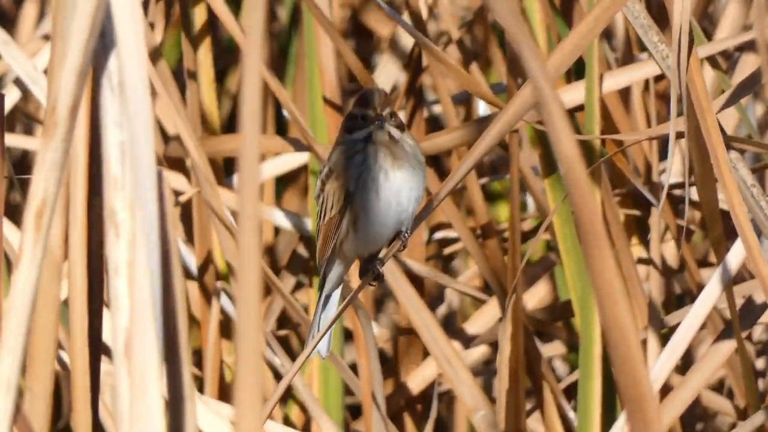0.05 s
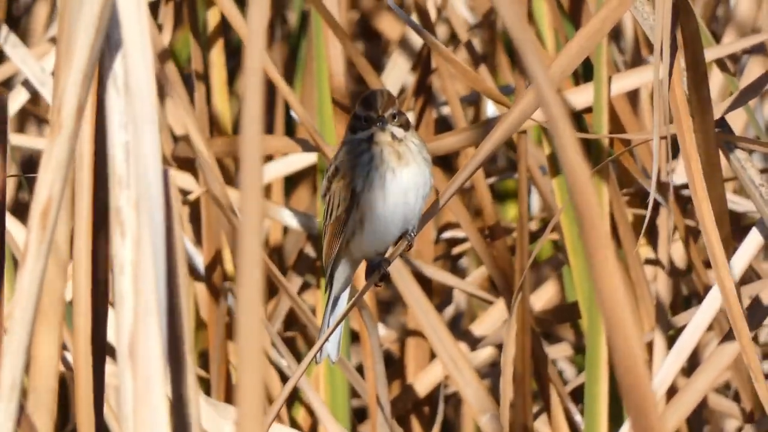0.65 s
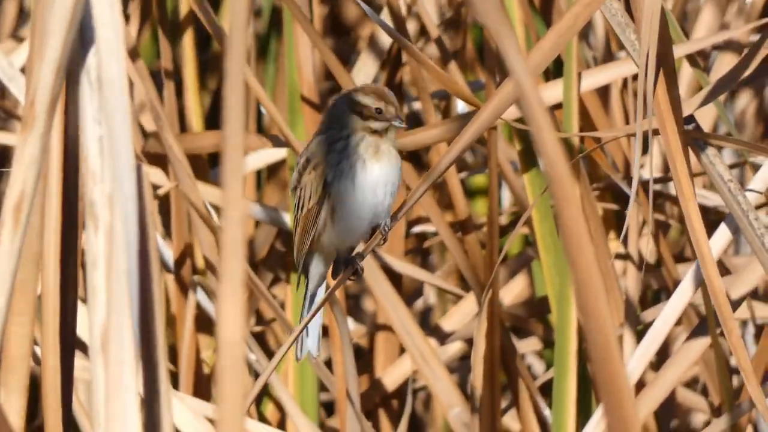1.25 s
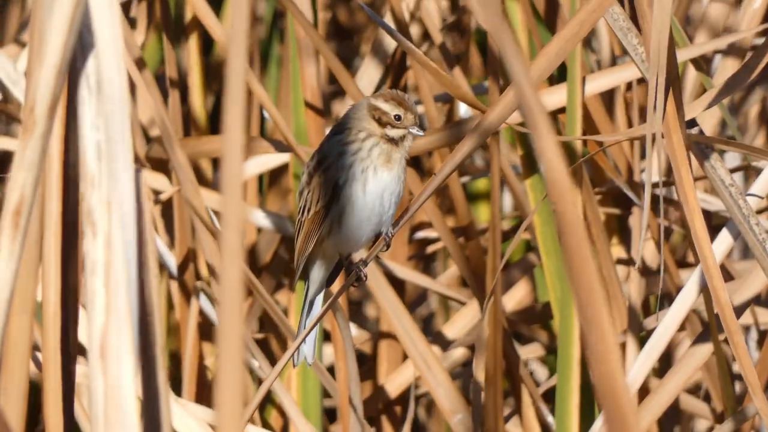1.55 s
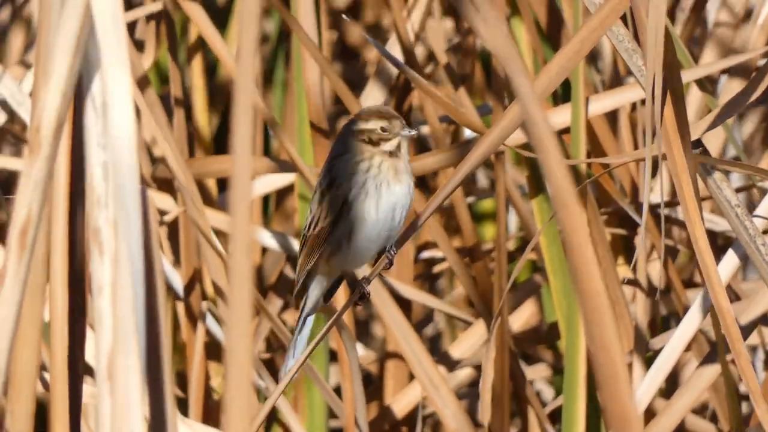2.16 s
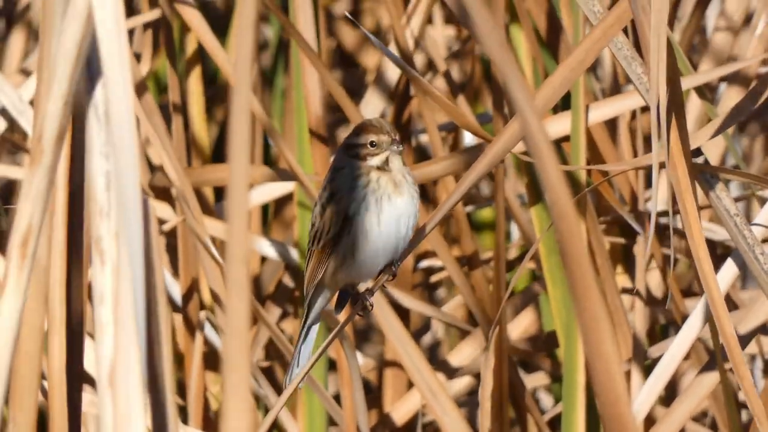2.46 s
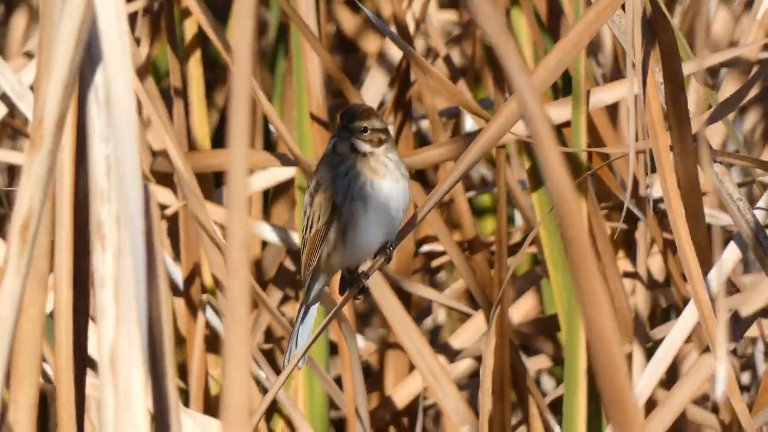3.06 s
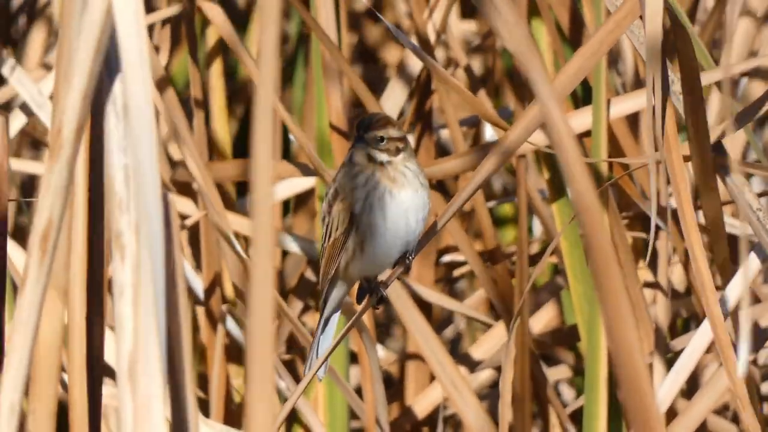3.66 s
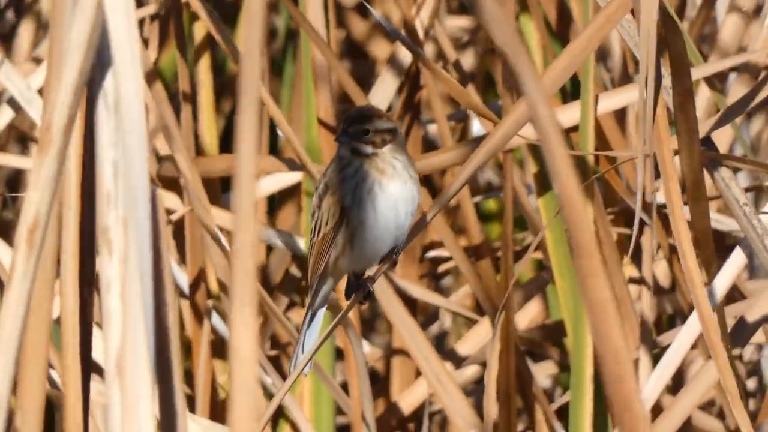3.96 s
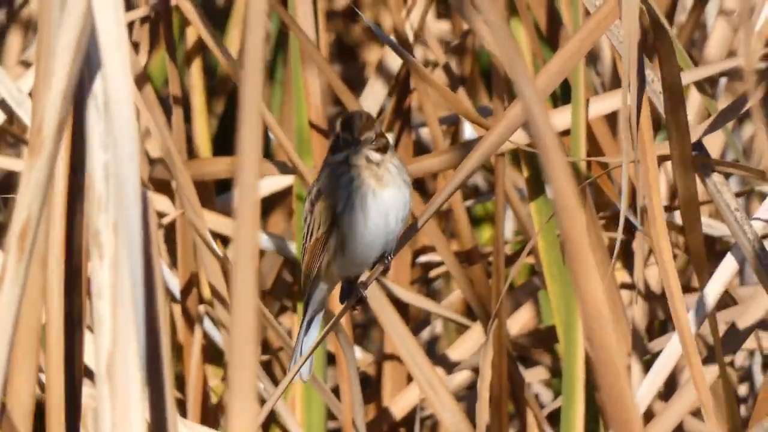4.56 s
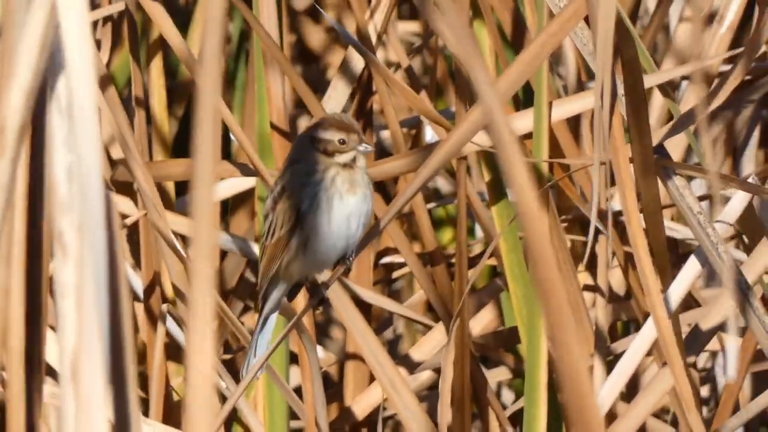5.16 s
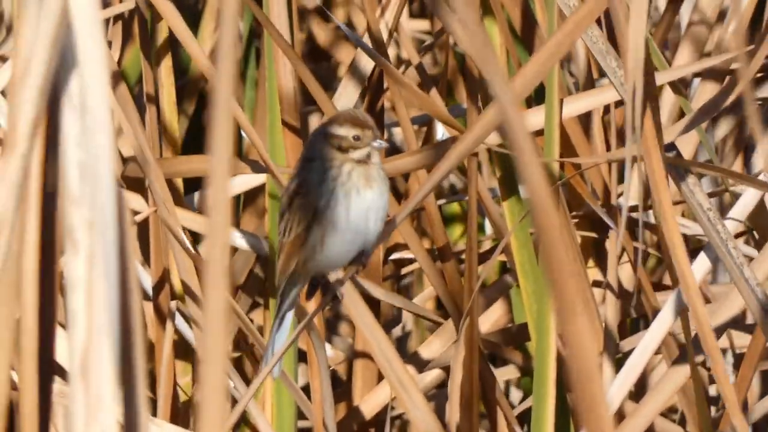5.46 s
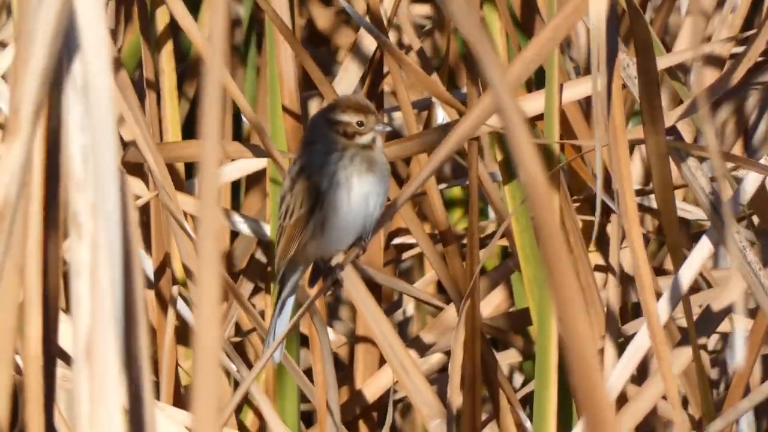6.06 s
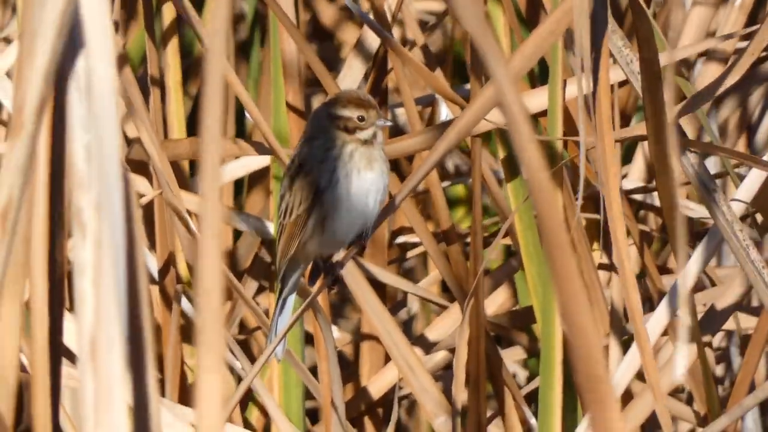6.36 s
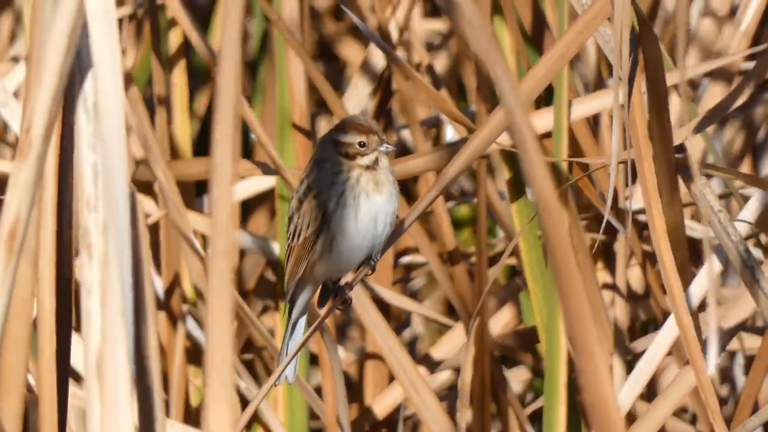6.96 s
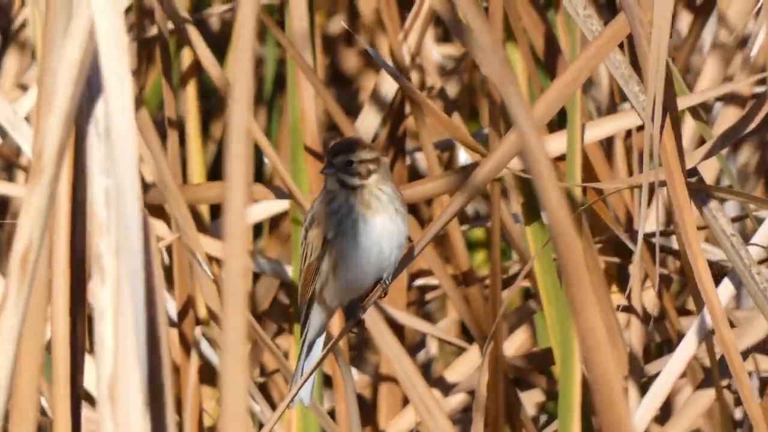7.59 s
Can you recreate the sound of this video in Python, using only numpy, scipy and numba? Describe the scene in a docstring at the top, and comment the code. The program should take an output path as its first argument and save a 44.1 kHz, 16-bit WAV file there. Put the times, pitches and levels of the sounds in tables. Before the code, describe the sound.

Outdoors in dry reeds, a soft hum and thin hiss run throughout. A small bird close by gives three quick, high, raspy chirps. Light wind then buffets the microphone in low puffs, building to one hard thump, while a distant bird whistles very faintly. Two softer runs of rapid chirps follow, among more puffs of wind and a few faint ticks of dry stems.

```python
"""In dry reeds, a soft resonant hum, likely the camera's lens motor, and thin hiss run throughout.
Light wind buffets the microphone in low puffs. At 1.8 s a small bird perched nearby gives a run of
quick, arched chirps from its syrinx; the stems scatter them. From 3.6 s a far bird whistles faintly.
The hardest puff, at 5.3 s, makes the gain control duck. Two softer runs of chirps follow at 5.8 s
and 7 s, among more puffs and the ticks of dry stems."""
import sys
import numpy as np
from scipy import signal
from scipy.fft import rfft, irfft, next_fast_len
from scipy.io import wavfile
from scipy.ndimage import uniform_filter1d
from numba import njit

SR = 44100
rng = np.random.default_rng(int(sys.argv[2]) if len(sys.argv) > 2 else 0)


def wav_out(sig):
    """Save sig, one row per channel (or a flat mono array), as 16-bit PCM at SR to the path in sys.argv[1]."""
    wavfile.write(sys.argv[1], SR, np.round(np.clip(np.atleast_2d(sig).T, -1, 1) * 32767).astype(np.int16))


N = 345303
T = np.arange(N) / SR


# the near bird's chirps: t/s, upsweep/s, arch/s, top f/Hz, level/dB, arch against the rest/dB
NEAR_CHIRPS = [(1.8, .013, 0.017, 7720, -39, 4.5), (1.874, .0165, 0.0087, 7020, -29, 3.5),
               (1.96, .021, 0.0092, 7020, -27.5, -1.5), (5.81, 0.017, .007, 6940, -58, -8),
               (5.885, 0.014, 0.0056, 6850, -50, -9), (5.977, 0.012, 0.016, 6880, -47.5, -2),
               (6.958, 0.011, .015, 7200, -53.5, -2), (7.035, 0.013, 0.011, 6450, -48, 0),
               (7.114, .013, .010, 6630, -45.5, -4), (7.214, 0.017, 0.0094, 7280, -40.5, -3),
               (7.299, .017, 0.01, 6860, -43, -5), (7.427, 0.013, 0.015, 6690, -45, -7.5),
               (7.516, .016, .011, 7000, -43.5, -7)]
# the top of the voice is beamed forward and dulls as the head turns: t/s, treble level/dB
BEAMED_TREBLE = [(1.9, -6), (5.9, -12), (7.3, -22)]
def near_bird(ordinary_db=-50):
    """Chirps among the stems; louder ones are aimed at the microphone and arrive more directly."""
    out = np.zeros((2, N))
    for s, sweep_s, arch_s, top_hz, db, arch_db in NEAR_CHIRPS:
        scatter_db = 1.5 - 0.2659 * max(db - ordinary_db, 0)
        voice = syrinx(sweep_s, arch_s, top_hz, arch_db)
        chirp = throat(voice, treble_db=np.interp(s, *np.transpose(BEAMED_TREBLE)))
        add(out, s, undb(db) * signal.fftconvolve(chirp[None], reeds(scatter_db), axes=1))
    return out


# a chirp opens with an upsweep: share of the sweep, share of the top pitch, level/dB
UPSWEEP = [(0, .37, -13), (0.251, .49, -7.5), (0.542, .64, 0.5), (.8, .84, -6)]
# it crests, sags and lifts again: share of the arch, share of the top pitch, level/dB
CREST = [(0, 1, -5.5), (0.201, 0.94, -5.5), (.55, .88, -3), (.88, .93, -9)]
# then it zigzags down: t/s after the arch, f/Hz, level/dB
ZIGZAG = [(.001, 5330, -4.5), (.003, 5030, 1.5), (.007, 5900, -3.5), (.009, 5390, -2), (.0112, 4350, 0),
          (0.014, 4800, -6.5), (.0185, 3790, -5.5)]
def syrinx(sweep_s, arch_s, top_hz, arch_db, second_ratio=.87, second_db=-8, overtone_db=-10,
           jitter=.035, rasp=.33, falter_db=2.2, fizz_db=-8, edge_s=0.0012):
    """Two grating voices sweep up, arch and zigzag down, fluttering in pitch and loudness."""
    contour = [(share * sweep_s, part * top_hz, db) for share, part, db in UPSWEEP]
    contour += [(sweep_s + share * arch_s, part * top_hz, db + arch_db) for share, part, db in CREST]
    contour += [(sweep_s + arch_s + s, hz, db) for s, hz, db in ZIGZAG]
    s, hz, db = np.transpose(contour)
    t = np.arange(0, s[-1], 1 / SR)
    n = len(t)
    pitch = np.interp(t, s, hz * (1 + .02 * rng.standard_normal(len(hz))))  # no two chirps alike
    phase = phase_of(pitch * (1 + jitter * walk(1500, n)))
    second_phase = phase_of(second_ratio * pitch * (1 + jitter * walk(1500, n)))
    second = undb(second_db) * (np.sin(second_phase) + undb(overtone_db) * np.sin(2 * second_phase))
    # the first voice's octave turns hoarse as the chirp goes on
    blur = 1.1 * np.clip(t / (sweep_s + arch_s), 0, 1) * walk(3000, n)
    overtones = undb(overtone_db) * np.sin(2 * phase + blur) + undb(-24) * np.sin(3 * phase)
    voice = np.sqrt(2) * (np.sin(phase) + second + overtones) + undb(fizz_db) * rng.standard_normal(n)
    edges = np.clip(np.minimum(t, t[-1] - t) / edge_s, 0, 1)
    swell = undb(np.interp(t, s, db) + falter_db * walk(220, n))
    return voice * edges * swell * (1 + rasp * walk(2000, n))


# response of the throat and open beak: f/Hz, level/dB
THROAT_RESPONSE = [(1200, -62), (2400, -17.5), (3200, -20), (4000, -21.5), (4600, -12.5), (5300, -3.5),
                   (6100, 0), (6900, -6.5), (7600, -17), (8300, -21.5), (10300, -8.5), (11800, -17.5),
                   (14500, -19)]
def throat(voice, treble_db, shelf_hz=8300):
    """The throat picks out what passes its resonances; a shelf dulls the top."""
    n = len(voice)
    gain = colour(THROAT_RESPONSE, n) * undb(treble_db * (bins(n) > shelf_hz))
    size = next_fast_len(n, True)
    return irfft(rfft(voice, size) * gain, size)


def reeds(scatter_db, gap_s=0.0021, near_decay_s=0.0092, far_t60_s=0.19, far_db=-7.5):
    """Path to the microphone: direct sound, echoes off the nearest stems, a faint reed-bed tail."""
    n = SR // 3
    t = T[:n]

    def echoes(band, decay_s, side_db):
        return spread(noise(band, n), noise(band, n), side_db) * np.exp(-t / decay_s) / np.sqrt(decay_s)

    # close stems return the whole chirp, the far bed only its middle band
    near = echoes(resonance(10200, 7600, n), near_decay_s, side_db=-13)
    far = echoes(resonance(5200, 4000, n), far_t60_s / np.log(1000), side_db=-7)
    onset = 1 - np.exp(-(t / gap_s) ** 2)
    response = undb(scatter_db) * (near + undb(far_db) * far) * onset * 2 / SR
    response[:, 0] += 1
    return response


# strength of the breeze at the microphone: t/s, relative level/dB
BREEZE_STRENGTH = [(0.0, -54.5), (0.22, -79), (0.34, -53.5), (0.48, -59), (0.74, -49.5), (1.02, -67.5),
                   (2.94, -55.5), (3.02, -47.5), (3.78, -44.5), (4.02, -64), (4.46, -45.5), (4.9, -51),
                   (4.96, -38), (5.26, -31.5), (5.3, -46), (5.8, -47.5), (5.88, -35), (6.2, -38),
                   (6.52, -61.5), (6.62, -40), (7.12, -63.5), (7.56, -39), (7.7, -60.5), (7.82, -50)]
# eddies that stand out from it: t/s, level/dB, length/s, f/Hz, left minus right/dB
STRONG_EDDIES = [(.687, -39, 0.0074, 146.4, -5), (.755, -40.5, 0.055, 169, 2.5),
                 (.875, -48.5, 0.028, 149.5, -1), (2.125, -55, 0.083, 121.7, 2),
                 (2.412, -45.5, 0.019, 140.2, -3), (2.514, -40.5, 0.024, 140.2, 3),
                 (2.855, -37.5, 0.034, 149, 1), (3.0, -33, 0.058, 115.2, -3.5), (3.03, -30, 0.011, 135, -2),
                 (3.177, -32, 0.024, 135, -2), (3.605, -26, 0.033, 119.8, 2), (3.621, -21, 0.012, 175.4, 6),
                 (3.685, -21.5, 0.0049, 233.3, -8), (4.11, -32.5, 0.014, 122.4, 0),
                 (4.425, -36, 0.02, 201.6, -4), (4.657, -32, 0.027, 157.5, -2),
                 (4.972, -33, 0.018, 136.6, 0), (5.04, -26.5, 0.0059, 189, -4),
                 (5.116, -24.5, 0.023, 195.6, -3), (5.153, -28, 0.033, 181.8, -1),
                 (5.217, -28, 0.024, 167, -5.5), (5.25, -28.5, 0.0082, 229, -6),
                 (5.262, -16, 0.012, 226, -2.5), (5.269, -15, 0.0038, 289.7, 13.5),
                 (5.274, -11.5, 0.012, 205, -6), (5.343, -25.5, 0.016, 248.3, 4.5),
                 (5.485, -39.5, 0.012, 223, -4), (5.52, -33, 0.012, 199, -2), (5.583, -37.5, 0.02, 197, -1),
                 (5.675, -26, 0.031, 190, 0), (5.705, -26, 0.015, 154, 0),
                 (5.885, -24.5, 0.0076, 116.8, -4.5), (5.937, -23.5, 0.0078, 148.5, 11),
                 (5.953, -27, 0.025, 208.7, -5), (5.977, -26, 0.018, 173.3, 1),
                 (5.998, -28.5, 0.022, 178.2, 1), (6.08, -31, .014, 140.5, 0),
                 (6.104, -20.5, 0.0067, 221.4, 5), (6.117, -28.5, 0.011, 158.2, -9),
                 (6.136, -32, 0.022, 128.4, 0), (6.183, -32, 0.01, 162.5, 4),
                 (6.23, -35.5, 0.038, 170.8, 5), (6.609, -32.5, 0.017, 135.5, 1),
                 (6.768, -37, 0.027, 118.1, -1), (7.271, -35.5, 0.038, 129.4, -3),
                 (7.508, -27.5, 0.011, 119.3, -1), (7.535, -21.5, 0.0027, 138.5, -5),
                 (7.563, -22.5, 0.013, 113.7, 0), (7.591, -24, 0.022, 170, -0.5)]
def wind(calm_db=-51, gust_db=-36.5, rumble_db=-4, flutter_db=10, low_cut_hz=72):
    """Fluttering rumble on the microphone swells and brightens with the breeze; single eddies thump."""
    breeze = curve(BREEZE_STRENGTH)
    gust = np.clip((breeze - calm_db) / (gust_db - calm_db), 0, 1)
    out = np.sqrt(1 - gust) * rumble(0.8) + np.sqrt(gust) * rumble(1.06)
    out *= undb(breeze + rumble_db + flutter_db * np.minimum(walk(42), 1.1))
    for s, db, length_s, hz, pan_db in list(STRONG_EDDIES) + small_eddies(breeze):
        t, thump = eddy(hz, length_s)
        add(out, s + t[0], undb(db) * pan(pan_db) * thump)
    # the microphone passes little of the deepest air movement
    return signal.sosfilt(signal.butter(3, low_cut_hz, "high", fs=SR, output="sos"), out)


# spectrum of turbulence on the microphone: f/Hz, relative level/dB
TURBULENCE = [(20, -23.5), (40, -25.5), (65, -1.5), (100, 5.5), (160, -0.5), (240, -3.5), (330, -18.5),
              (450, -27.5), (700, -33.5), (1500, -59.5), (3000, -87)]
def rumble(hz_ratio, side_db=-6):
    """Turbulence at the two microphone ports; small eddies differ more between them than large ones."""
    gain = colour([(hz * hz_ratio, db) for hz, db in TURBULENCE])
    apart = colour([(50, -5), (130, 1.5), (300, 12.0)])
    return spread(unit(noise(gain)), unit(noise(gain * apart)), side_db)


# an eddy breaking on the port cracks above its thump: f/Hz, relative level/dB
PORT_CRACK = [(200, -20), (420, 13.5), (900, -8.5), (1400, -11.5), (2600, -29), (4000, -47), (7000, -30),
              (12000, -51)]
def eddy(hz, length_s, wander=0.3, apart_rad=0.68, churn_db=-6, crack_db=-31):
    """A few uneven pressure swings swell and fade; the two ports meet them slightly out of step."""
    n = SR // 6
    t = T[:n] - T[n // 2]
    phase = 2 * np.pi * rng.random() + phase_of(hz * np.exp(wander * walk(400, n)))
    lead = apart_rad * np.tanh(2 * walk(58.2, n))
    swings = np.sqrt(2) * np.cos(phase + lead * np.array([[1], [-1]]))
    churn = unit(noise(colour([(f * hz / 150, db) for f, db in TURBULENCE], n), n))
    crack = unit(noise(colour(PORT_CRACK, n), n))
    bell = np.exp(-np.log(16) * (t / length_s) ** 2)
    return t, (swings + undb(churn_db) * churn + undb(crack_db) * crack) * bell


def small_eddies(breeze, per_s=9, typical_s=0.0086, typical_hz=149.6):
    """Random rows like STRONG_EDDIES, scattered about the breeze's level; shorter ones thump higher."""
    count = int(per_s * N / SR)
    offset, weakness, stretch = rng.uniform(-0.68, 1, (count, 3)).T
    s = (np.arange(count) + .5 + offset / 2) / per_s
    db = np.interp(s, T, breeze) + 2 - 8 * weakness
    slowness = 2 ** (stretch / 2)
    return list(zip(s, db, typical_s * slowness, typical_hz / slowness, np.zeros(count)))


# brief lulls in the hum: t/s, length/s, level/dB
LULLS = [(0.29, 0.018, -10), (0.386, 0.017, -20), (0.483, 0.059, -5)]
def motor_hum():
    """A small motor hums close to the microphone; its level dips briefly near the start."""
    lull_db = sum(db * np.exp(-(2 * (T - s) / length_s) ** 2) for s, length_s, db in LULLS)
    return undb(lull_db) * (camera_body() + whirr() + thin_tone())


# resonances of the body: f/Hz, width/Hz, level/dB per Hz, left minus right/dB, left lead/rad
BODY_MODES = [(399, 78, -79, -2.5, 1.5), (477.5, 88, -75, -0.5, 0.32), (684, 30.6, -83.5, 14, 0.5),
              (795.5, 86, -86, -12, 2), (844, 60, -82, -10.5, 4), (870, 72, -89, 6, 2),
              (1059, 79, -82.5, -11, 2.5), (1189, 105, -91.5, 12, 1.5), (1340, 63, -86.5, -16.5, 4),
              (1402, 41, -84, -14, -0.5), (1498, 110, -94, -11, -1), (1809.5, 115, -87, -6, -1.9),
              (2095.5, 74, -85, -1, -1.2), (2164, 65, -88.5, -3, -1)]
def camera_body(side_db=-8, flicker_db=2.5):
    """The motor's noise rings the camera body; each resonance reaches the two ports differently."""
    out = np.zeros((2, N))
    for hz, width_hz, db, pan_db, lead in BODY_MODES:
        ports = pan(pan_db) * np.exp(.5j * lead * np.array([[1], [-1]]))
        gain = undb(db) * resonance(hz, width_hz) * ports
        out += spread(noise(gain), noise(gain), side_db)
    return out * undb(flicker_db * walk(60))


# the hum's main note: f/Hz, width/Hz, level/dB, left minus right/dB
MAIN_NOTE = (499.5, 16, -55, -6)
def whirr(waver_hz=7, wavers_per_s=1.1):
    """The motor's main note, a narrow band of noise that wavers in pitch."""
    hz, width_hz, db, pan_db = MAIN_NOTE
    pitch = hz + waver_hz * (np.sin(2 * np.pi * wavers_per_s * T) + .5 * walk(5))
    amplitude = unit(walk(2 * width_hz) + 1j * walk(2 * width_hz) + 0.46)
    return np.sqrt(2) * undb(db) * pan(pan_db) * np.real(amplitude * np.exp(1j * phase_of(pitch)))


# swell of a thin tone in the hum: t/s, level/dB
THIN_SWELL = [(4.3, -87), (4.7, -72), (6.0, -74.5), (6.5, -76), (6.8, -69), (7.5, -66), (7.8, -88)]
def thin_tone(hz=959):
    """A thin, slightly unsteady tone comes and goes."""
    level = undb(curve(THIN_SWELL) + 2.4 * walk(9))
    return np.sqrt(2) * level * np.sin(phase_of(hz + 4 * walk(14)))


# whistles from far off: t/s, length/s, start f/Hz, end f/Hz, level/dB
FAR_WHISTLES = [(3.606, 0.049, 6330, 4570, -73), (3.645, 0.055, 4750, 3920, -80),
                (3.74, 0.042, 5600, 4800, -75), (4.37, 0.033, 2820, 3530, -68),
                (4.41, 0.046, 3400, 3290, -78)]
def far_bird(scatter_db=7):
    """A distant bird's slurred whistles, scattered by the reeds on their way to the microphone."""
    out = np.zeros((2, N))
    for s, length_s, start_hz, end_hz, db in FAR_WHISTLES:
        pitch = np.linspace(start_hz, end_hz, int(length_s * SR))
        whistle = np.hanning(len(pitch)) * np.sin(phase_of(pitch))
        add(out, s, undb(db) * signal.fftconvolve(whistle[None], reeds(scatter_db), axes=1))
    return out


# ticks in the reed bed: t/s, f/Hz, level/dB
TICKS = [(.302, 2900, -78), (6.025, 2780, -60.5), (6.041, 3260, -67), (6.059, 2900, -65), (6.25, 2900, -66),
         (6.616, 2900, -64), (7.086, 3020, -69), (7.653, 2880, -63)]
def dry_stems(decay_s=0.0086, width_hz=1100):
    """Dry stems tick, each a band of noise that dies at once."""
    out = np.zeros((2, N))
    n = SR // 30
    for s, hz, db in TICKS:
        ring = unit(noise(resonance(hz, width_hz, n), n))
        add(out, s, undb(db) * ring * np.exp(-T[:n] / decay_s))
    return out


# swell of the high hiss: t/s, level/dB
HISS_SWELL = [(0, -112), (1.8, -75), (2.3, -79), (3.7, -82), (4.3, -102)]
def high_hiss_swell(hz=6000, width_hz=3600, side_db=-6):
    """A faint band of high hiss swells and fades."""
    band = resonance(hz, width_hz)
    level = undb(curve(HISS_SWELL) + 1.4 * walk(8.5))
    return level * spread(unit(noise(band)), unit(noise(band)), side_db)


# noise floor of the air and the microphone: f/Hz, level/dB per Hz
NOISE_FLOOR = [(20, -100), (90, -100.5), (250, -105), (560, -95.5), (900, -94), (1600, -108),
               (2600, -107.5), (3400, -109), (4300, -113), (6200, -111.5), (8000, -114.5), (8400, -121),
               (8800, -114), (9800, -112.5), (12500, -117.5), (15000, -124)]
def hiss(side_db=-6):
    """Even hiss, mostly common to both ports."""
    gain = colour(NOISE_FLOOR)
    return spread(noise(gain), noise(gain), side_db)


def undb(db):
    """Decibels to gain."""
    return 10 ** (np.asarray(db) / 20)


def unit(x):
    """Scale to rms 1."""
    return x / np.sqrt(np.mean(np.abs(x) ** 2))


def curve(rows):
    """Join (t/s, value) rows by straight lines."""
    return np.interp(T, *np.transpose(rows))


def phase_of(hz):
    """Running phase of a changing pitch, in radians."""
    return 2 * np.pi * np.cumsum(hz) / SR


def pan(db):
    """Left and right gains for a level difference."""
    return undb(np.array([[db], [-db]]) / 2)


def bins(n):
    """Bin frequencies for a sound of n samples."""
    return np.fft.rfftfreq(next_fast_len(n, True), 1 / SR)


def colour(points, n=N):
    """Gain per bin from (f/Hz, level/dB) points."""
    hz, db = np.transpose(points)
    return undb(np.interp(np.log(bins(n) + 1), np.log(hz), db))


def resonance(hz, width_hz, n=N):
    """Steep-sided resonance as a gain per bin."""
    return 1 / (1 + (2 * (bins(n) - hz) / width_hz) ** 2)


def noise(gain, n=N):
    """Noise with this gain per bin; gain 1 is 0 dB per Hz."""
    size = next_fast_len(n, True)
    return irfft(rfft(rng.standard_normal(size)) * gain, size)[..., :n] * np.sqrt(SR / 2)


def walk(per_s, n=N):
    """Smooth random drift with spread near 1."""
    hold = max(int(SR / per_s), 1)
    steps = np.repeat(rng.standard_normal(n // hold + 1), hold)
    return 1.276 * uniform_filter1d(uniform_filter1d(steps, hold), hold)[:n]


def spread(mid, side, side_db):
    """Left and right from a common and an opposed part, keeping the power."""
    return (mid + undb(side_db) * side * np.array([[1], [-1]])) / np.sqrt(1 + undb(side_db) ** 2)


def add(out, s, sound):
    """Mix a sound in from time s."""
    start = int(s * SR)
    part = sound[..., max(-start, 0):max(N - start, 0)]
    out[:, max(start, 0):max(start, 0) + part.shape[-1]] += part


@njit
def follow(x, attack, release):
    """Envelope that rises fast and falls slowly."""
    out, level = np.empty(len(x)), 0.
    for i in range(len(x)):
        level += (x[i] - level) * (attack if x[i] > level else release)
        out[i] = level
    return out


def scene():
    """The reed bed as it reaches the two microphone ports."""
    return near_bird() + far_bird() + dry_stems() + wind() + motor_hum() + high_hiss_swell() + hiss()


def record(dry, threshold_db=-16.5, attack_s=0.013, release_s=.22, top_hz=15000):
    """Gain control ducks after the hardest thump; the top is cut."""
    envelope = follow(np.abs(dry).max(axis=0), 1 / (attack_s * SR), 1 / (release_s * SR))
    gain = np.minimum(1, undb(threshold_db) / (envelope + 1e-9))
    return signal.sosfilt(signal.ellip(8, .2, 70, top_hz, fs=SR, output="sos"), dry * gain)


dry = scene()
out = record(dry)
wav_out(out)
```